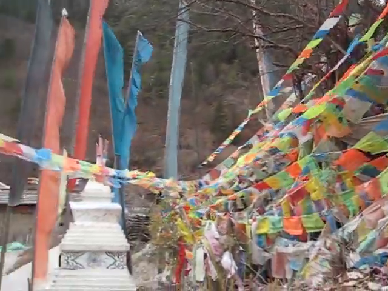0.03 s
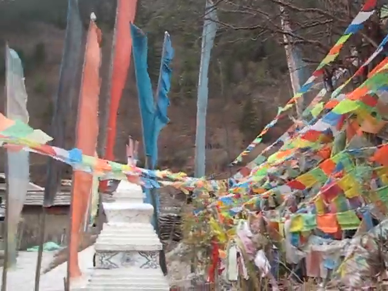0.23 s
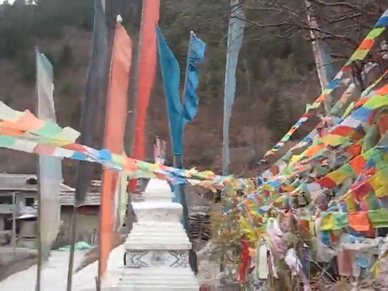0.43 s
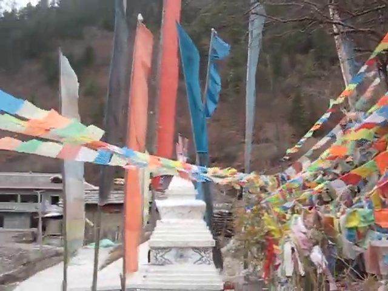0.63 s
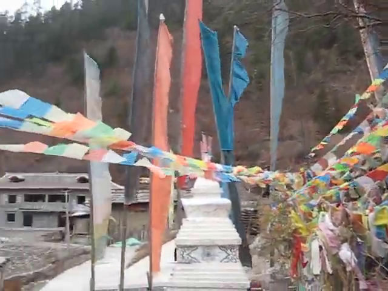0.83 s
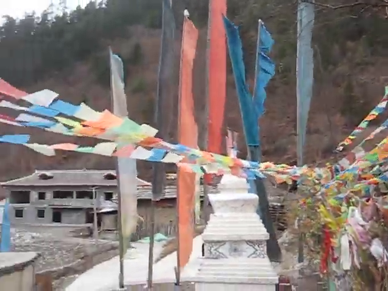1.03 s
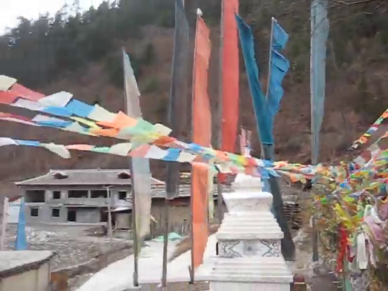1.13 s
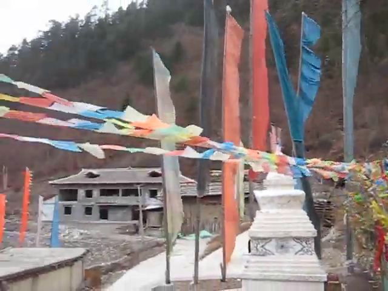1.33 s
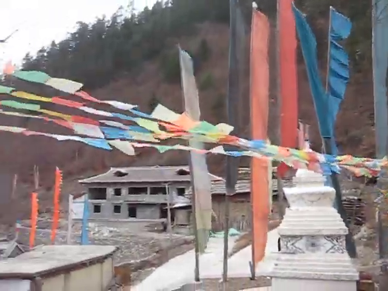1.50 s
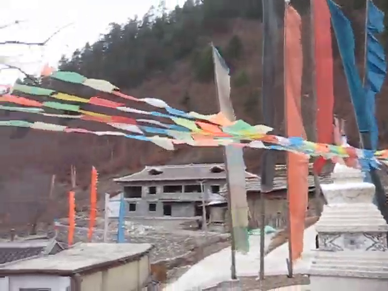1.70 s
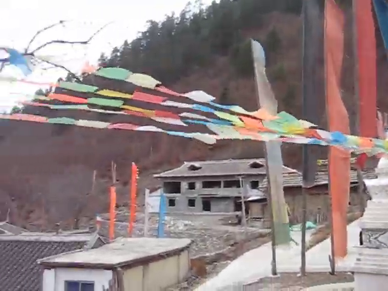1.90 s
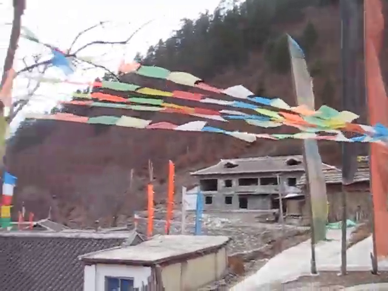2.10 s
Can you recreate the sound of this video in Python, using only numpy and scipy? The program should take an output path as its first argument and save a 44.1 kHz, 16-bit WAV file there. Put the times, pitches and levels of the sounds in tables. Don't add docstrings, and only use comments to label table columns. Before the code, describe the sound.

Wind buffets an unshielded microphone on an open hillside, low thumps crowding early and thinning out; later a close cloth flag snaps hard and flutters, over a soft steady rush of distant flags and trees.

```python
import sys
import numpy as np
from scipy import signal
from scipy.fft import rfft, irfft
from scipy.io import wavfile
from scipy.ndimage import uniform_filter1d

SR = 44100
rng = np.random.default_rng(int(sys.argv[2]) if len(sys.argv) > 2 else 0)


def int16_out(signal):
    q = np.round(np.clip(np.atleast_2d(signal).T, -1, 1) * 32767)
    wavfile.write(sys.argv[1], SR, q.astype(np.int16))


def undo_db(level):
    steps = np.asarray(level, float) / 20
    return 10 ** steps


N = 94815

# (time [s], level [dB])
RUSH_LEVEL = [(0, -44), (.4, -43), (1.4, -43.5), (2.15, -43)]
# (frequency [Hz], density [dB per Hz])
RUSH_COLOUR = [(100, -31), (250, -9), (450, -5), (700, -3.5), (1200, -4.5), (1900, -12), (2700, -19),
               (6090, -25), (13000, -37.5)]

# (time [s], rms level [dB], rise [ms], fall [ms])
SWISHES = [(.28, -58, 17, 15), (1.11, -49, 28, 12), (1.535, -41, 20, 10), (1.59, -41, 15, 13),
           (1.64, -37.5, 17, 10), (1.681, -28.5, 11, 13.7), (1.753, -36.5, 27, 7.3),
           (1.796, -35.5, 16.3, 13), (1.865, -40.5, 26, 15.4), (1.91, -39.5, 12.4, 22),
           (2.005, -47, 29, 25), (2.098, -52, 12, 14)]
# (frequency [Hz], density [dB per Hz])
CLOTH_COLOUR = [(350, -34), (800, -11), (1360, -8), (2610, -11.5), (3160, -9.5), (5010, -11), (6060, -12),
                (11500, -18.5), (15500, -33)]
# (time [s], peak level [dB], colour [octaves above 1 kHz], decay [ms])
SNAPS = [(0.1762, -35, 2.5, 1.3), (.228, -37, 3, 1.5), (.237, -38, 3.5, 1.5), (.242, -42, 2.2, 1.5),
         (0.2658, -36, 2.7, 1.5), (.2706, -31, 2.8, 1), (0.2762, -26.5, 3.2, 1.5), (0.284, -32, 2.4, 1.5),
         (.299, -35, 2.1, 2), (.313, -32.5, 2.3, 1.2), (0.316, -27.5, 2.35, 1.3), (.3265, -33.5, 2, 1.1),
         (.541, -38.5, 2.3, 3.3), (1.365, -32.5, 1.3, 3.4), (1.53, -36, 2.2, 4), (1.575, -35, 2.35, 3.3),
         (1.6501, -13, 2.8, 0.31), (1.652, -29, 1.4, 2), (1.6666, -15, 1.27, 2.4), (1.6778, -9, 1.7, 1.5),
         (1.673, -21, 1.4, 2.3), (1.6825, -13, 2.1, 1.7), (1.6853, -22, 2.6, 3.3), (1.727, -36, 2.6, 5),
         (1.747, -30, 1.7, 3), (1.755, -29, 1.8, 3), (1.7427, -29, 1.7, 3.4), (1.778, -23.5, 2, 3.3),
         (1.784, -28, 3.4, 3), (1.7928, -22.5, 2.2, 4.1), (1.801, -35, 2.3, 2.5), (1.811, -37, 2.2, 4),
         (1.8804, -30, 2, 2.3), (1.8983, -25, 2.15, 2), (1.91, -26.5, 2.04, 2.9), (2.0031, -25, 3.2, 0.91),
         (2.011, -23, 3.2, 1), (2.073, -37, 3, 1), (2.0939, -25, 2.6, 1.1), (2.109, -33, 2.1, 1),
         (2.0985, -33, 2.3, 1.5), (1.9865, -37, 2.7, 1), (1.995, -37, 3, 1), (1.864, -31, 2.3, 2),
         (1.418, -40, 2.2, 1), (1.624, -36, 3.2, 1.5)]
# (frequency [Hz], width [Hz], lift [dB])
TAUT_RESONANCES = [(3130, 230, 7.5), (5870, 1300, 4), (7670, 430, 5), (10270, 1240, 6.5)]

# (time [s], level [dB])
GUST_LEVEL = [(0, -44), (.09, -44), (.15, -47.5), (.27, -38), (.72, -42.5), (.77, -50), (.85, -41.5),
              (1.08, -41), (1.14, -53), (1.23, -55), (1.3, -40), (1.39, -46), (1.43, -54.5), (1.58, -56),
              (1.7, -45), (1.93, -47), (2.04, -65), (2.15, -51.5)]
# (frequency [Hz], density [dB per Hz])
RUMBLE_COLOUR = [(20, -31), (40, 2), (80, 4.5), (150, 7), (260, 1), (450, -39), (800, -53)]
# (frequency [Hz], density [dB per Hz])
WAKE_COLOUR = [(30, -34), (70, -6.5), (200, 1), (380, -1), (800, -18), (1600, -47)]

# (time [s], peak level [dB], pitch [Hz], length [ms])
BUFFETS = [(0.2424, -24.5, 312, 4), (0.2522, -17.5, 310, 3.5), (0.2607, -19, 300, 1.8),
           (0.2815, -15.5, 402, 1.8), (0.2852, -14.5, 244, 3.8), (0.3372, -11, 566, 3.5),
           (0.347, -11.5, 380, 3.8), (0.3533, -14, 356, 2.9), (0.3669, -16.5, 390, 3.3),
           (0.3825, -18.5, 418, 4.5), (0.4107, -16, 380, 4.2), (0.4959, -21, 251, 1.4),
           (0.5029, -26.5, 189, 9.3), (0.5191, -12, 380, 4.2), (0.5219, -8, 374, 1.83),
           (0.5248, -17.5, 330, 2.7), (0.5914, -18, 310, 4.9), (0.6162, -23, 332, 4.4),
           (0.6514, -17, 330, 1.2), (0.8029, -21.5, 365, 1.8), (0.8166, -16, 442, 3.6),
           (0.8685, -22, 298, 2), (0.8816, -22.5, 346, 2.8), (0.9527, -17.5, 356, 3.3),
           (1.006, -16, 392, 4.7), (1.0236, -24, 364, 1.8), (1.0306, -22, 345, 3.8),
           (1.0398, -22.5, 240, 2.5), (1.0445, -21, 240, 2.6), (1.0566, -18.5, 386, 2.4),
           (1.2596, -23, 260, 3), (1.2665, -9.5, 287, 2.03), (1.628, -29, 308, 8.8),
           (1.7305, -31.5, 298, 10), (1.669, -33.5, 190, 7), (1.749, -33, 200, 9), (1.795, -34.5, 220, 7),
           (1.779, -30.5, 980, 4.3), (1.19, -40, 240, 7.7)]
# (time [s], peak level [dB], pitch [Hz])
MORE_EDDIES = [(0.084, -28, 210), (0.1998, -29.5, 262), (0.297, -26, 233), (0.3187, -28.5, 215),
               (0.3404, -14, 235), (0.357, -32, 460), (0.378, -23, 252), (0.3933, -25, 279), (0.4206, -30, 237),
               (0.4551, -26.5, 300), (0.5382, -24.5, 295), (0.549, -26, 345), (0.556, -29.5, 286),
               (0.661, -28, 266), (0.6903, -24.5, 335), (0.7028, -33, 260), (0.834, -29, 260),
               (0.8435, -28.5, 231), (0.9583, -25, 300), (0.9839, -25, 278), (1.0657, -20.5, 227),
               (1.2858, -28, 350), (1.2535, -27.5, 350), (1.2705, -22.5, 220), (1.679, -31, 260),
               (0.179, -32, 260), (0.329, -24, 260), (0.384, -22.5, 480), (0.746, -32, 333), (0.8084, -20.5, 210),
               (0.892, -27, 240), (0.91, -31, 220), (0.9476, -24.5, 330), (0.994, -27, 150), (1.088, -29.5, 220),
               (0.431, -29, 210), (0.443, -31, 200)]

# (frequency [Hz], rms level [dB])
WHINES = [(7575, -70.5), (15120, -87), (15150, -76), (15735, -82)]


def rms_one(x):
    return x / np.sqrt(np.mean(x ** 2) + 1e-20)


def in_time(rows):
    return np.interp(np.arange(N) / SR, *np.transpose(rows))


def coloured(x, points):
    hz, db = np.transpose(points)
    log_hz = np.log(np.fft.rfftfreq(len(x), 1 / SR) + 1)
    gain = undo_db(np.interp(log_hz, np.log(hz), db))
    return rms_one(irfft(rfft(x) * gain, len(x)))


def drift(rate_hz):
    r = np.exp(-2 * np.pi * rate_hz / SR)
    noise = rng.standard_normal(N + SR)
    settled = signal.lfilter([1], [1, -2 * r, r * r], noise)[SR:]
    return rms_one(settled)


def patchy(x, shared_db, own_db, rate_hz):
    spectrum = rfft(x)
    octave = np.log2(np.fft.rfftfreq(N, 1 / SR) + 1)
    together = shared_db * drift(rate_hz / 4)
    out = np.zeros(N)
    for centre in range(4, 16):
        band = irfft(spectrum * np.clip(1 - abs(octave - centre), 0, 1), N)
        out += band * undo_db(together + own_db * drift(rate_hz))
    return rms_one(out)


def rush():
    noise = coloured(rng.standard_normal(N), RUSH_COLOUR)
    return undo_db(in_time(RUSH_LEVEL) + 3.0) * patchy(noise, 0.13, 0.82, 14.0)


def swishes():
    grains_per_s, grain_spread_db, air_share = 7600, 3, 1.9
    t = np.arange(N) / SR
    swell = np.zeros(N)
    for s, db, rise_ms, fall_ms in SWISHES:
        side_ms = np.where(t < s, rise_ms, fall_ms)
        swell += undo_db(db) * np.exp(-.5 * (1000 * (t - s) / side_ms) ** 2)
    struck = rng.random(N) < grains_per_s / SR
    grain_level = undo_db(grain_spread_db * np.minimum(rng.exponential(1, N), 3.5))
    grains = struck * grain_level * rng.choice([-1, 1], N)
    weave = coloured(rms_one(grains) + air_share * rng.standard_normal(N), CLOTH_COLOUR)
    return swell * patchy(weave, 0.89, 3.1, 42.0)


def snaps():
    width_octaves, tail_db, tail_s, attack_s = 0.92, -26, 0.023, 0.00039
    top_hz, top_slope = 12300, 8
    out, t = np.zeros(N + SR), np.arange(2048) / SR
    hz = np.fft.rfftfreq(len(t), 1 / SR) + 1
    lift_db = sum(db * np.exp(-.5 * ((hz - centre) / width * 2) ** 2) for centre, width, db in TAUT_RESONANCES)
    for s, db, colour, decay_ms in SNAPS:
        top_roll = 1 / (1 + (hz * np.clip(2 * decay_ms, .7, 1) / top_hz) ** top_slope)
        distance = (np.log2(hz / 1000) - colour) / width_octaves * decay_ms ** 0.16
        tone = undo_db(lift_db) * top_roll * np.exp(-.5 * distance ** 2)
        noise = irfft(rfft(rng.standard_normal(len(t))) * tone)
        fade = np.exp(-1000 * t / decay_ms) + undo_db(tail_db) * np.exp(-t / tail_s)
        crack = noise * fade * np.minimum(t / attack_s, 1)
        start = int(s * SR)
        out[start:start + len(t)] += undo_db(db) * crack / np.abs(crack).max()
    return out[:N]


def rumble(thumps):
    lump_db, lumps_per_s, wake_db, wake_s = 0.5, 22, -10, 0.015
    lumps = undo_db(lump_db * np.clip(drift(lumps_per_s), -2, 2)) * rng.standard_normal(N)
    size = int(wake_s * SR)
    power = uniform_filter1d(uniform_filter1d(thumps ** 2, size), size)
    wake = np.sqrt(np.abs(power)) * coloured(lumps, WAKE_COLOUR)
    steady = patchy(coloured(rng.standard_normal(N), RUMBLE_COLOUR), 0.6, 1.0, 22.0)
    return undo_db(in_time(GUST_LEVEL)) * steady + undo_db(wake_db) * wake


def eddies():
    common_ms, rise_share, pitch_sag = 4.05, 0.68, 0.13
    phase_spread, wander = 0.45, 0.59
    overtone, steepening = 0.16, 1
    port_cut_hz = 119
    half = 800
    out, t = np.zeros(N + SR), np.arange(-half, half) / SR
    rows = list(BUFFETS) + [(*row, common_ms) for row in MORE_EDDIES]
    for s, db, hz, ms in rows:
        start_turn, overtone_turn, wander_depth, wander_turn = rng.normal(0, 1, 4)
        width = 0.57 * ms / 1000
        sagged_time = t - pitch_sag * width * np.log(np.cosh(t / width))
        phase = 2 * np.pi * hz * sagged_time + phase_spread * start_turn
        phase = phase + wander * wander_depth * np.sin(2.14 * t / width + 2 * wander_turn)
        shape = np.exp(-.5 * (t / width / np.where(t < 0, rise_share, 1)) ** 2)
        edge = (overtone + steepening * undo_db(db)) * shape
        second = edge * np.cos(2 * phase + 0.064 * overtone_turn)
        third = 0.36 * edge ** 2 * np.cos(3 * phase)
        start = int(s * SR)
        out[start:start + len(t)] += undo_db(db) * shape * (np.cos(phase) + second + third)
    port = signal.butter(2, port_cut_hz, "high", fs=SR, output="sos")
    return signal.sosfilt(port, out[half:N + half])


def scene():
    thumps = eddies()
    mix = rush() + swishes() + snaps() + rumble(thumps) + thumps
    return mix[None]


def roll_off(x):
    return signal.sosfilt(signal.butter(12, 16450, fs=SR, output="sos"), x)


def record(dry):
    hiss_db, hump_db, hump_hz, hump_width_hz = -55.5, -61.5, 14400, 1000
    low_cut_hz, high_cut_hz = 13, 15750
    r, w = np.exp(-np.pi * hump_width_hz / SR), 2 * np.pi * hump_hz / SR
    poles = [1, -2 * r * np.cos(w), r * r]
    hump = rms_one(signal.lfilter([1], np.convolve(poles, poles), rng.standard_normal(N)))
    t = np.arange(N) / SR
    whines = sum(np.sqrt(2) * undo_db(db) * np.sin(2 * np.pi * hz * t) for hz, db in WHINES)
    x = dry + undo_db(hiss_db) * rng.standard_normal(N) + undo_db(hump_db) * hump + whines
    x = signal.sosfilt(signal.butter(2, low_cut_hz, "high", fs=SR, output="sos"), x)
    x = signal.sosfilt(signal.ellip(12, .5, 55, high_cut_hz, fs=SR, output="sos"), x)
    return roll_off(x)


dry = scene()
out = record(dry)
int16_out(out)
```